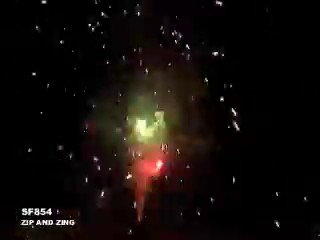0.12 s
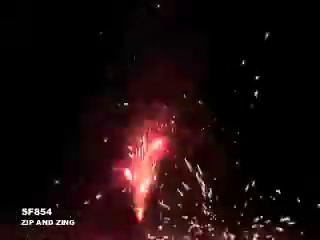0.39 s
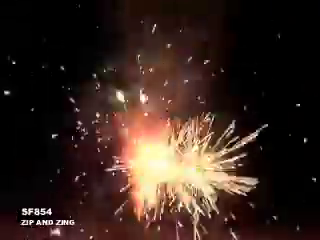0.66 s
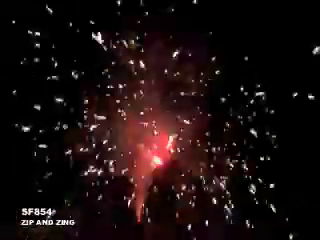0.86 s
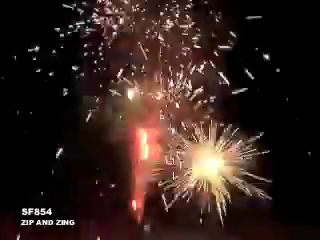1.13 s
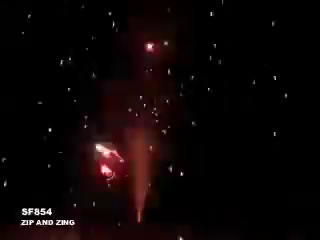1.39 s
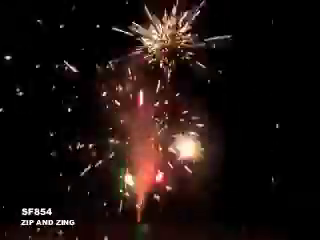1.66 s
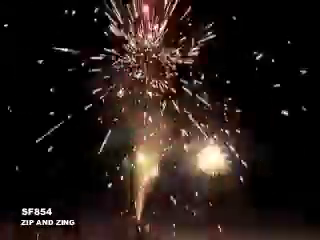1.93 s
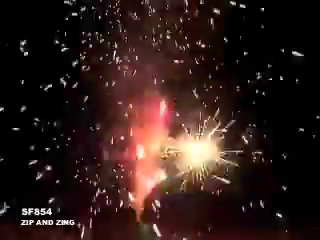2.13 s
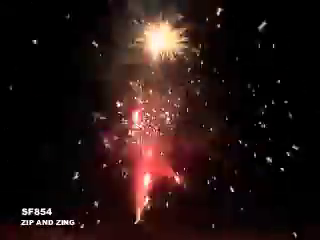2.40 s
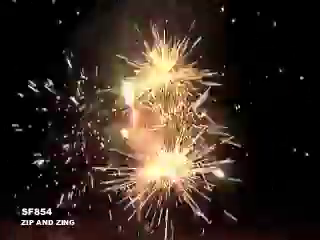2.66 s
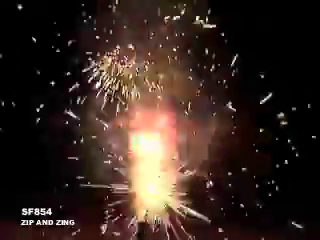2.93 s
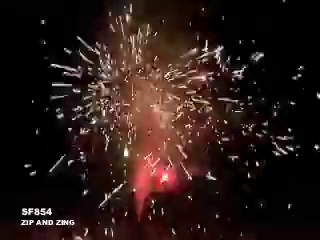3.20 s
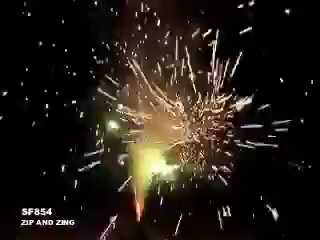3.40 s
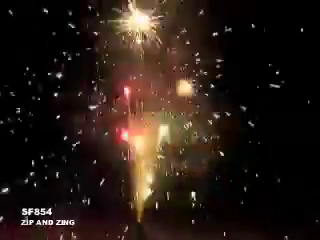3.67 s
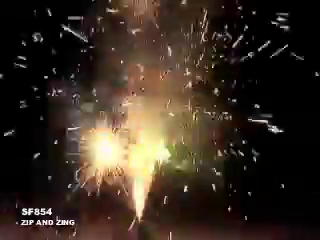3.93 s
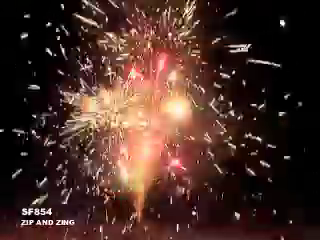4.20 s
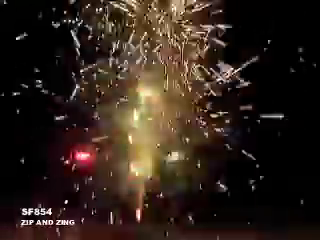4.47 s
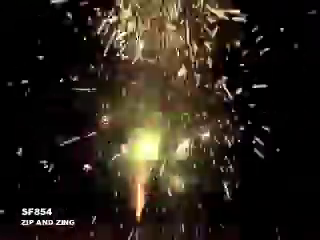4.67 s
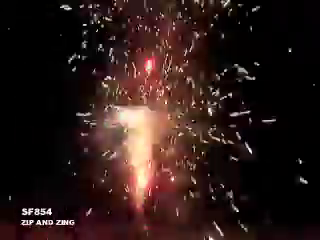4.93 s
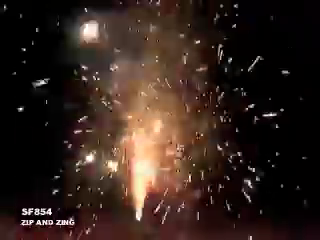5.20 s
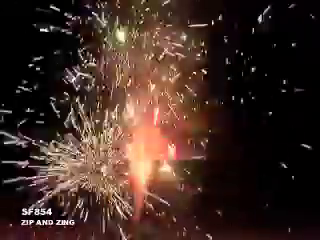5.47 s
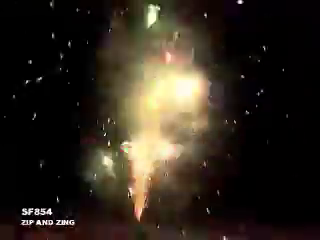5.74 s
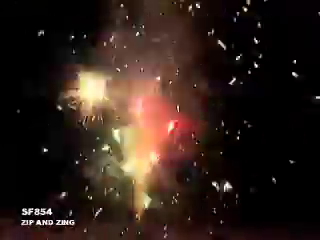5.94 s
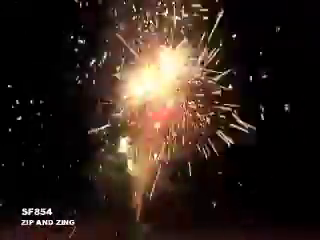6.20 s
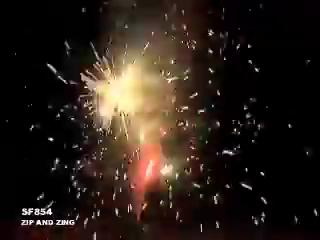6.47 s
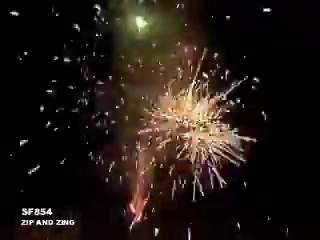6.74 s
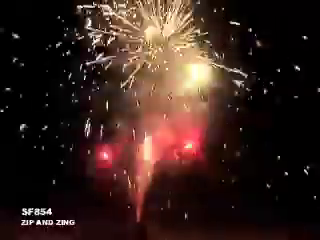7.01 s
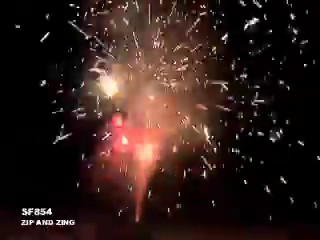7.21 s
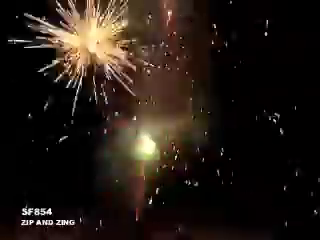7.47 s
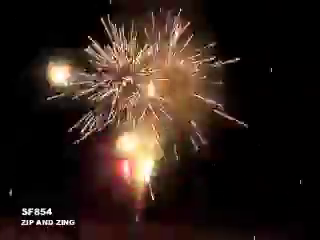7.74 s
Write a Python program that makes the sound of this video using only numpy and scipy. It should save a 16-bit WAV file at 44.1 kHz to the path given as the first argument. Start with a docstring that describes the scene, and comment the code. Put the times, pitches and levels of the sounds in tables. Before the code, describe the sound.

A firework fountain burns on hard ground outdoors, heard by a small stereo microphone some metres away. From 0 s sharp, bright cracks burst individually: four quick snaps, a short gap until about 0.27 s, then a dense cluster from 0.6 to 0.87 s. After a brief pause they resume at 1.03 s, becoming sparser from 1.3 to 1.9 s, with a dull low knock near 1.58 s. From about 2 s the crackling is thick and nearly continuous, uneven in rhythm, with an especially strong snap at 4.6 s. Small gaps appear near 5.7 s and 7.3 s, and a longer one from 7.57 to 7.8 s before a final cluster. Every crack has a tight ground bounce, dull bumps and a hissy scattered tail fading within half a second. Underneath, the fountain's quiet jet hisses and rumbles steadily until the end at about 8 s.

```python
"""Sharp crackles burst one by one: a firework fountain on hard ground, some metres from a small stereo microphone.
Each star is a tiny blast wave followed by its ground bounce, late for a high star, early for a low one.
Dull bumps and a hissy tail of scatter follow every burst; some bursts carry a short dull ring as extra bass.
Below it all the jet of the fountain, shaped noise, hisses and rumbles steadily."""
import sys
import numpy as np
from scipy import signal
from scipy.fft import rfft, irfft
from scipy.io import wavfile

SR = 44100
rng = np.random.default_rng(int(sys.argv[2]) if len(sys.argv) > 2 else 0)


def convert_level_to_amplitude(level_db):
    """Map a level in decibels to its linear amplitude factor."""
    exponent = np.asarray(level_db, float) / 20
    return 10 ** exponent


def unload_wav(signal):
    """Save mono or channel-first audio to the path in sys.argv[1] as 16-bit WAV at rate SR, clipped to [-1, 1]."""
    wavfile.write(
        sys.argv[1],
        SR,
        np.round(np.clip(np.atleast_2d(signal).T, -1, 1) * 32767).astype(np.int16),
    )


N = 347067  # samples in the scene

# Dull bumps after each burst: its own low push first, then later echoes.
# Each row: delay in seconds, level in dB.
BUMPS = [(0.0019, -28.5), (0.011, -38), (0.016, -37), (0.033, -33)]


def resonance(x, hz, width_hz):
    """The band of x around hz, gain 1 on top."""
    r = np.exp(-np.pi * width_hz / SR)
    feedback = [1, -2 * r * np.cos(2 * np.pi * hz / SR), r * r]
    return signal.lfilter([(1 - r * r) / 2, 0, (r * r - 1) / 2], feedback, x)


def butter(x, hz, kind):
    """A Butterworth filter designed at order two."""
    return signal.sosfilt(signal.butter(2, hz, kind, fs=SR, output="sos"), x)


def clicks(at_s, sizes):
    """One sample of the given size at each moment."""
    out = np.zeros(N)
    np.add.at(out, np.minimum(np.round(at_s * SR).astype(int), N - 1), sizes)
    return out


def shocks(at_s, db, bounce_ms):
    """Mid and side: direct shock, duller ground bounce, bumps and low swell, each star from its own side;
    a third row holds the bare shock that is scattered."""
    bounce_db, bounce_spread_db, bounce_cut_hz = -3.7, 2.2, 8800
    dull_db = 16  # a star this far below 0 dB has lost its top
    tiny = 1e-18  # inaudible offset ahead of the filters
    chance = rng.standard_normal((len(at_s), 7))
    direct = convert_level_to_amplitude(db)
    direct_clicks = clicks(at_s, direct)
    bounce_size = direct * convert_level_to_amplitude(bounce_db + bounce_spread_db * chance[:, 1])
    bounce = clicks(at_s + bounce_ms / 1000 - 1 / SR, bounce_size)
    mid = direct_clicks + butter(bounce + tiny, bounce_cut_hz, "low")

    # each star knocks more or less roundly and has more or less snap
    mid += butter(clicks(at_s, .25 * direct * chance[:, 3]) + tiny, 1500, "low")
    mid += resonance(clicks(at_s, .6 * direct * chance[:, 4]) + tiny, 2200, 1500)
    # faint stars are far or in smoke: duller
    lost_top = direct * np.clip(-db / dull_db, 0, 1)
    mid -= butter(clicks(at_s, lost_top) + tiny, 7800, "high")

    # between the two ports only treble is shadowed, and the lag is under one sample
    shadow_size = direct * (.25 * chance[:, 0] - .19)
    shadow = resonance(clicks(at_s, shadow_size) + tiny, 4500, 3500)
    lag = np.diff(clicks(at_s, .13 * direct * chance[:, 2]), prepend=0)

    wave = blast()
    peak = np.argmax(wave)  # each wave peaks at its click
    sharp = signal.fftconvolve([mid, shadow + lag, direct_clicks], wave[None])[:, peak:][:, :N]
    sharp[:2] += bumps(at_s, direct)
    sharp[0] += low_swell(at_s, direct * convert_level_to_amplitude(4 * chance[:, 5]))
    sharp[1] += low_swell(at_s, direct * 0.083 * chance[:, 6])
    return sharp


def blast():
    """A pressure jump, a quick fall and an equal suction phase, as the capsule hears it; peak 1."""
    # How the microphone colours a shock. Each row: centre in Hz, width in Hz, gain in dB.
    capsule = [(415, 225, 11.5), (627, 106, -4), (900, 690, 19), (5410, 3730, 18), (8510, 950, -6.5),
               (10600, 3700, 10.5)]
    blast_s = 0.0001  # from the jump to zero pressure
    t = np.arange(SR // 20) / SR / blast_s
    wave = (1 - t) * np.exp(-t)
    for hz, width_hz, db in capsule:
        wave = wave + (convert_level_to_amplitude(db) - 1) * resonance(wave, hz, width_hz)
    return wave / wave.max()


def low_swell(at_s, sizes):
    """Each burst is followed by a slow one-sided low swell."""
    swell_db, swell_s = -43, 0.0026
    t = np.arange(SR // 20) / SR / swell_s
    swell = t ** 2 * np.exp(2 - 2 * t)  # peaks at 1 after swell_s
    return convert_level_to_amplitude(swell_db) * signal.fftconvolve(clicks(at_s, sizes), swell)[:N]


def bumps(at_s, sizes):
    """Mid and side: dull round bumps after each burst; delay, size and side vary at random from star to star."""
    bump_s, low_hz = 0.00059, 107  # width of the bump, low cut
    chance = rng.standard_normal((len(at_s), len(BUMPS), 3))
    hits = 0
    for (delay_s, bump_db), (late, big, aside) in zip(BUMPS, chance.transpose(1, 2, 0)):
        when = at_s + delay_s * (1 + .015 * late)
        size = sizes * convert_level_to_amplitude(bump_db + 3 * big)
        hits = hits + np.array([clicks(when, size), clicks(when, .18 * size * aside)])
    t = np.arange(-SR // 400, SR // 400 + 1) / SR
    bump = np.exp(-.5 * (t / bump_s) ** 2)
    rounded = signal.fftconvolve(hits, bump[None], "same")
    return signal.lfilter([1, -1], [1, -np.exp(-2 * np.pi * low_hz / SR)], rounded)


def low_rings():
    """Some bursts carry extra bass: a short dull ring near 430 Hz, with fainter echoes."""
    # The extra bass of some bursts. Each row: start in seconds, level in dB.
    rings = [(0.279, -27), (0.4307, -18), (1.569, -27), (1.5839, -20.5), (3.1848, -26), (3.3917, -31),
             (3.5682, -27), (6.1655, -34), (7.418, -33)]
    ring_hz, ring_s, echo_db = 432, 0.0024, -12
    at_s, db = np.transpose(rings)
    t = np.arange(SR // 40) / SR
    ring = -np.sin(2 * np.pi * ring_hz * t) * np.exp(-t / ring_s)
    hits = clicks(at_s, convert_level_to_amplitude(db))
    for delay_s, _ in BUMPS[1:]:  # the later echoes only
        hits = hits + clicks(at_s + delay_s, convert_level_to_amplitude(db + echo_db))
    return signal.fftconvolve(hits, ring)[:N]


def surroundings():
    """Mid and side answer of walls and bushes to one click: scatter, strong at first, holds, then dies."""
    # The scattered tail by octave. Each row: centre in Hz, level in dB.
    scatter = [(180, -65), (360, -33), (720, -42), (1400, -42.5), (2800, -42), (5600, -45), (11000, -39.5)]
    t60_s, hold_s, rise_s = 0.42, 0.0067, 0.00032
    near_db, near_s = 16, 0.003  # extra level of the nearest scatter and how soon it fades
    air_db_per_s = 11  # extra loss at 10 kHz
    big_faces_per_s = 1500  # only large surfaces return the bass
    t = np.arange(SR // 2) / SR
    # separate small reflections of uneven size; neighbouring octaves draw on different ones
    white = rng.standard_normal((2, 2, len(t))) * rng.exponential(np.sqrt(.5), len(t))
    faces = (rng.random(len(t)) < big_faces_per_s / SR) * np.sqrt(SR / big_faces_per_s)
    fade_db = -60 * (np.sqrt(t ** 2 + hold_s ** 2) - hold_s) / t60_s
    shape = (1 - np.exp(-t / rise_s)) * convert_level_to_amplitude(fade_db + near_db * np.exp(-t / near_s))
    tail = np.zeros((2, len(t)))
    for k, (hz, db) in enumerate(scatter):
        air = convert_level_to_amplitude(-air_db_per_s * (hz / 10000) ** 2 * t)
        reflections = white[k % 2] * (faces if hz < 1000 else 1) * shape * air
        tail += convert_level_to_amplitude(db) * butter(reflections, [hz / np.sqrt(2), hz * np.sqrt(2)], "band")
    mid, side = tail
    side = convert_level_to_amplitude(-5.5) * butter(side, 2900, "high")  # close ports hear the bass alike
    return butter(np.array([mid, side]), 9200, "low")  # the tail is dull, with little above 9 kHz


def jet():
    """Smooth hiss and rumble, alike on both sides in the bass and partly apart in the treble."""
    # Spectrum of the jet. Each row: frequency in Hz, relative density in dB per Hz.
    spectrum = [(30, -9), (450, -8.5), (1000, -24), (6000, -16), (16000, -41)]
    jet_db = -54.5  # rms of the mid
    hz = np.maximum(np.fft.rfftfreq(N, 1 / SR), 1)
    corner_hz, corner_db = np.transpose(spectrum)
    colour = convert_level_to_amplitude(np.interp(np.log(hz), np.log(corner_hz), corner_db))
    apart = 0.071 * hz / (hz + 1500)  # share of the side
    white = rfft(rng.standard_normal((2, N)))
    mid, side = irfft(white * colour * [np.ones_like(hz), apart], N)
    return convert_level_to_amplitude(jet_db) / mid.std() * np.array([mid, side])


def scene():
    """Stars dealt in turn to eight different random scatter tails, over the jet; left and right."""
    # Star bursts. Each row: start in seconds, level in dB, delay of the ground bounce in ms.
    bursts = [(0.015, -1, 1.4), (0.0257, -4, 0.67), (0.058, -1.5, 0.9), (0.097, -2.5, 1.23),
              (0.2667, -2.5, 0.7), (0.3291, -2.5, 0.31), (0.334, -4.5, 0.28), (0.3732, -15.5, 0.14),
              (0.43, -4, 0.73), (0.5164, -2, 0.99), (0.5911, -2, 0.89), (0.6057, -5, 0.56),
              (0.6289, -0.5, 0.33), (0.67, -8.5, 0.6), (0.7366, -3.5, 0.37), (0.7469, 1, 0.43),
              (0.7499, -9, 0.48), (0.7697, -4, 0.73), (0.8006, -1.5, 0.67), (0.8235, -3, 0.2),
              (0.8326, 1, 0.66), (0.8374, -2, 0.58), (0.839, -1.5, 0.67), (0.8584, -6, 0.59),
              (0.8711, -1.5, 0.65), (1.032, -4, 0.68), (1.0611, -3, 0.64), (1.0875, -5, 1.02),
              (1.1053, -4.5, 1.17), (1.1306, -2.5, 1.17), (1.1485, -11.5, 0.63), (1.197, -1, 0.43),
              (1.221, -4, 0.61), (1.3143, -2, 0.81), (1.4945, -5.5, 0.61), (1.569, -3, 0.63),
              (1.5847, -11.5, 0.35), (1.6928, -15, 0.54), (1.7272, -11.5, 1.06), (1.7646, -2.5, 0.51),
              (1.8179, -6.5, 0.73), (1.897, -18, 0.66), (1.9625, -1.5, 0.99), (2.0041, -3, 1.23),
              (2.007, -2.5, 0.45), (2.0145, -2.5, 0.52), (2.061, -0.5, 0.48), (2.0882, -2.5, 1.2),
              (2.0983, 0.5, 1.2), (2.113, 0, 0.59), (2.1403, -2.5, 0.68), (2.1937, -3, 0.45),
              (2.219, -3.5, 0.72), (2.3215, -9, 0.54), (2.381, -0.5, 0.54), (2.4738, -2.5, 1),
              (2.498, -0.5, 0.42), (2.5324, -1, 0.6), (2.5563, -11, 1.06), (2.5608, -2, 0.52),
              (2.5877, -7.5, 0.36), (2.605, -1, 0.41), (2.709, -3.5, 0.62), (2.7331, -8.5, 0.52),
              (2.7413, -2.5, 0.86), (2.7481, -3.5, 0.44), (2.8088, -3, 0.56), (2.814, -1.5, 0.55),
              (2.8441, -7, 0.93), (2.854, -6, 0.5), (2.9292, -1, 1.03), (2.933, -2.5, 0.3),
              (2.9913, -3, 0.84), (3.0255, -3.5, 0.74), (3.033, -3.5, 0.46), (3.0745, -2, 0.91),
              (3.0832, -1.5, 0.43), (3.1856, -8.5, 0.68), (3.213, -0.5, 0.5), (3.2268, -5, 0.71),
              (3.244, -4.5, 0.81), (3.2963, -1.5, 1.14), (3.33, -2.5, 0.75), (3.391, -5, 0.75),
              (3.4455, -1, 0.58), (3.4492, -0.5, 0.53), (3.5236, -1, 0.45), (3.5436, 1.0, 0.79),
              (3.5684, -6.5, 0.57), (3.6273, 1, 0.55), (3.6332, -5, 0.6), (3.652, -5.5, 0.95),
              (3.7433, -12, 1.18), (3.801, -5.5, 0.67), (3.8096, -2.5, 0.44), (3.8586, -3.5, 0.92),
              (3.8731, -1, 0.49), (3.9081, -3.5, 0.74), (3.9348, -1, 1.15), (3.948, -4.5, 0.57),
              (3.9906, -3.5, 1.2), (4.0, -1.5, 0.48), (4.0379, -8, 0.71), (4.083, -7.5, 1.2),
              (4.1137, -7.5, 0.56), (4.1478, 0.5, 0.29), (4.155, -5.5, 0.57), (4.184, -6.5, 0.46),
              (4.1966, 0.5, 0.33), (4.2008, -9, 0.6), (4.209, 1.5, 0.49), (4.233, -2.5, 1.1),
              (4.2606, -7, 0.64), (4.284, -1, 0.68), (4.381, -1.5, 0.44), (4.4239, -8, 0.79),
              (4.456, -2, 0.61), (4.4848, -1.5, 1.3), (4.4998, -4, 0.66), (4.5176, -1, 0.66),
              (4.5243, -2.5, 1.2), (4.5674, -5.5, 0.89), (4.576, -4, 1.2), (4.6074, 4, 1.34),
              (4.625, -2, 0.51), (4.6547, -7.5, 0.7), (4.708, -5, 0.95), (4.7101, -3.5, 0.48),
              (4.7136, -1, 1.25), (4.8193, -7.5, 1), (4.8272, -4.5, 0.68), (4.8837, -1.5, 0.58),
              (4.943, -2.5, 0.16), (4.965, -5.5, 1.02), (4.975, -3.5, 0.58), (5.0475, -7, 0.66),
              (5.06, 1.0, 1.27), (5.0868, -1, 0.64), (5.123, -0.5, 0.75), (5.131, -6, 0.47),
              (5.1454, -3.5, 0.48), (5.1893, -3, 0.88), (5.24, 0, 0.53), (5.2817, -4.5, 1.23),
              (5.2904, -6, 0.67), (5.334, -7, 1.16), (5.3936, -10, 0.67), (5.4041, -5.5, 0.42),
              (5.4298, -1, 0.72), (5.4671, -6, 0.68), (5.507, -3, 1.2), (5.5095, -4, 0.6),
              (5.5286, -3, 0.45), (5.5411, -2.5, 0.48), (5.5713, -3.5, 0.8), (5.6, 0.5, 0.53),
              (5.6475, -2.5, 0.75), (5.683, -2, 1.02), (5.756, -18, 1.3), (5.838, -5.5, 0.7),
              (5.8479, -6.5, 0.45), (5.8576, -3.5, 0.74), (5.88, -2.5, 1.3), (5.9075, -4.5, 1.3),
              (5.9513, 0, 0.51), (6.039, -2, 0.8), (6.0788, -0.5, 1.13), (6.0984, -5.5, 1.27),
              (6.13, -2.5, 0.66), (6.1656, -3.5, 0.66), (6.2008, -4.5, 1.2), (6.254, -1, 0.72),
              (6.264, -13, 0.49), (6.2722, -2.5, 0.95), (6.2905, -0.5, 0.64), (6.2972, -5.5, 1.2),
              (6.3093, 0.5, 0.6), (6.3184, -10, 0.55), (6.356, -3.5, 1.02), (6.4115, 0.5, 0.58),
              (6.4537, -8.5, 0.59), (6.4844, -7.5, 0.62), (6.5453, -2.5, 0.76), (6.6174, -2, 1),
              (6.6297, -4, 1.1), (6.6431, -4, 0.68), (6.6606, -3, 0.73), (6.7152, 0.5, 0.24),
              (6.7644, 0.5, 0.79), (6.8166, -2, 0.58), (6.8937, -12.5, 0.93), (6.948, 0.5, 1.48),
              (6.9543, 0, 0.72), (6.9641, -6.5, 0.68), (7.0043, -3, 1.2), (7.0534, -1, 1.04),
              (7.0781, -7, 0.9), (7.0997, -6.5, 1.47), (7.152, 0, 1.43), (7.1768, -7, 1.2),
              (7.1831, -2.5, 1.48), (7.2179, -2.5, 0.72), (7.2273, -9, 0.88), (7.2818, -9.5, 0.75),
              (7.292, -8.5, 1.4), (7.3997, -0.5, 0.4), (7.4088, -12, 1.9), (7.418, 1, 0.47),
              (7.437, -10, 0.7), (7.457, 0, 1.3), (7.5397, -0.5, 1.07), (7.5697, -1.5, 0.91),
              (7.8047, -7, 0.79), (7.8119, -3, 0.87), (7.8414, -4.5, 0.95), (7.8627, -2.5, 0.77)]
    total = jet()
    for k in range(8):
        direct = shocks(*np.transpose(bursts[k::8]))
        scattered = signal.fftconvolve(direct[2:], surroundings())[:, :N]
        total = total + direct[:2] + scattered
    mid, side = total
    mid = mid + low_rings()
    return np.array([mid + side, mid - side])


def band_limit(x):
    """A steep low-pass at the top of the band."""
    return signal.sosfilt(signal.butter(12, 16970, fs=SR, output="sos"), x)


def record(dry):
    """The preamp rounds the highest peaks; then the deepest bass and the top are cut."""
    rounded = 0.87 * np.tanh(dry / 0.84)
    mix = butter(rounded, 1.3, "high")
    top_cut = signal.cheby2(16, 60, 16900, fs=SR, output="sos")  # 60 dB down from 16900 Hz
    mix = signal.sosfilt(top_cut, mix)
    return band_limit(mix)


dry = scene()
out = record(dry)
unload_wav(out)
```